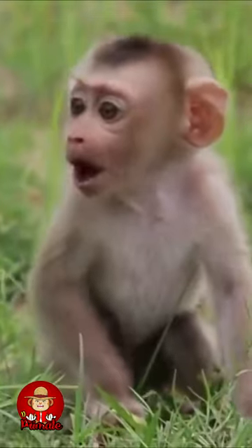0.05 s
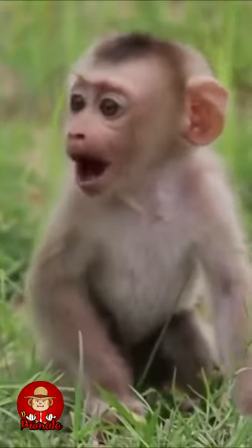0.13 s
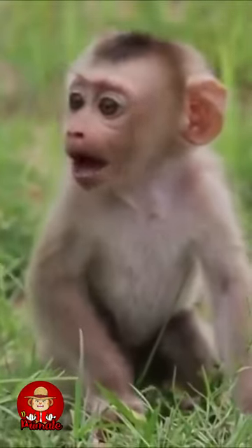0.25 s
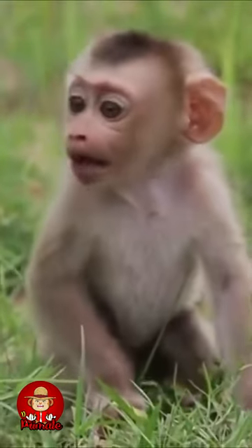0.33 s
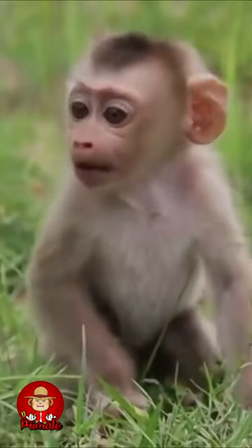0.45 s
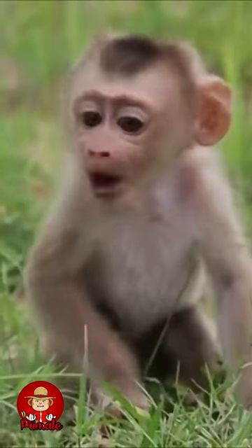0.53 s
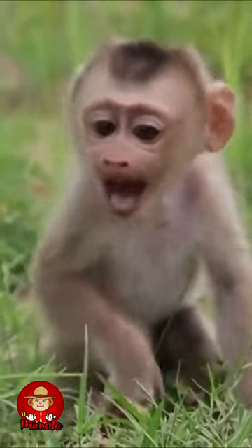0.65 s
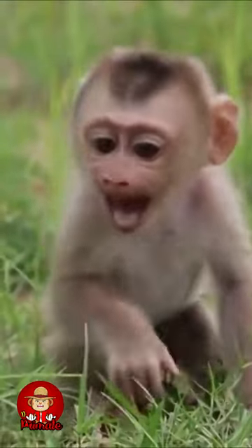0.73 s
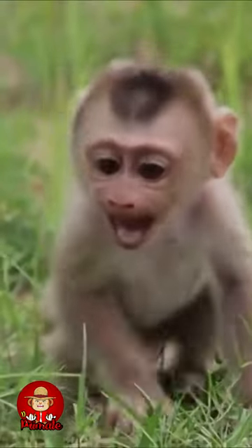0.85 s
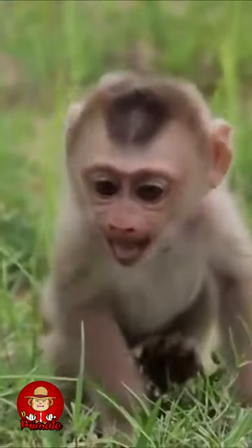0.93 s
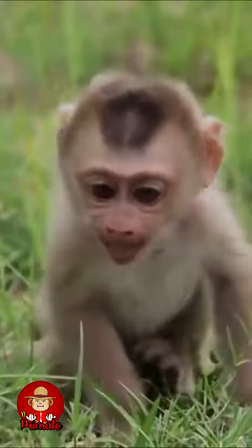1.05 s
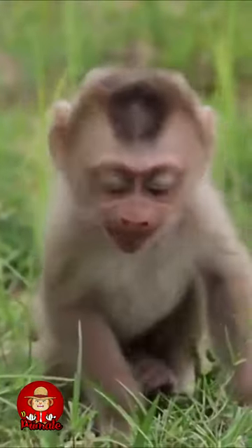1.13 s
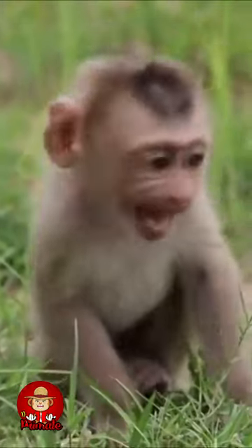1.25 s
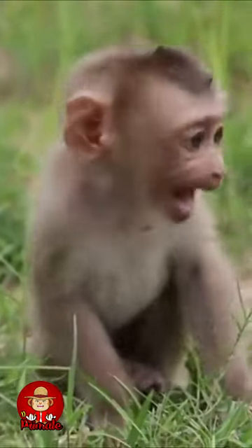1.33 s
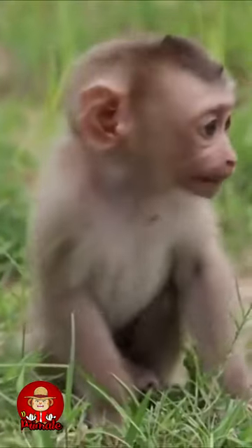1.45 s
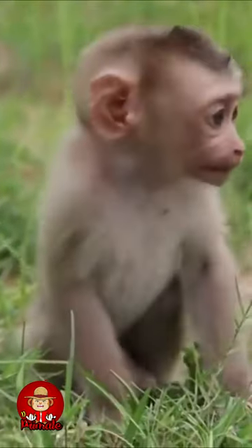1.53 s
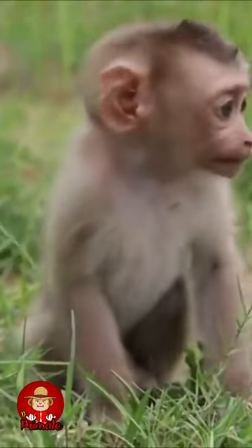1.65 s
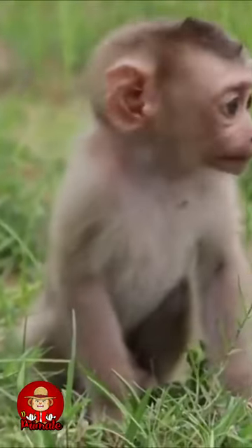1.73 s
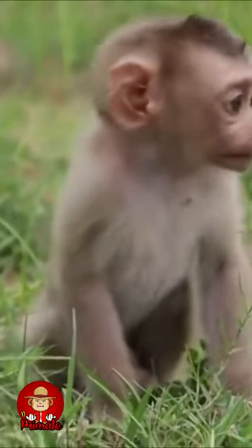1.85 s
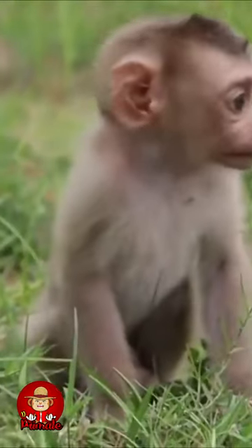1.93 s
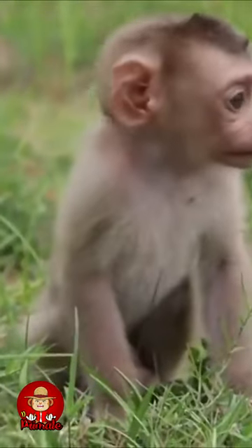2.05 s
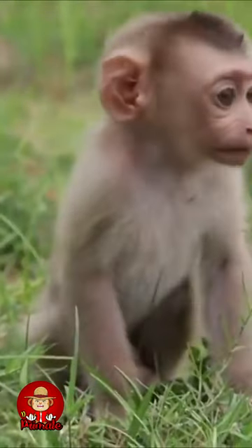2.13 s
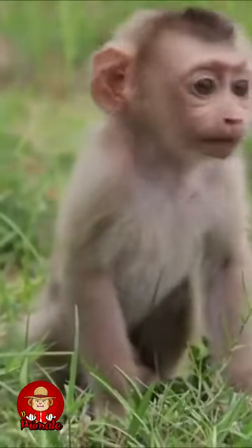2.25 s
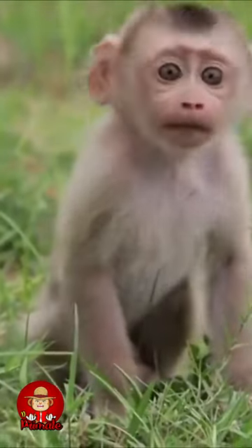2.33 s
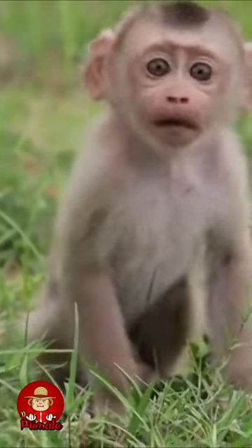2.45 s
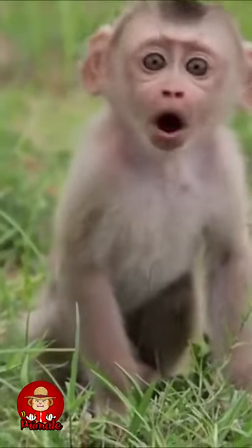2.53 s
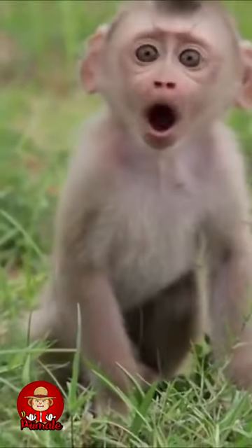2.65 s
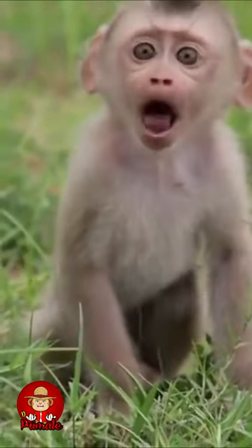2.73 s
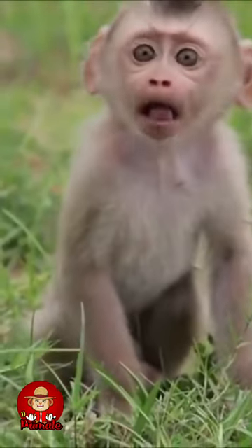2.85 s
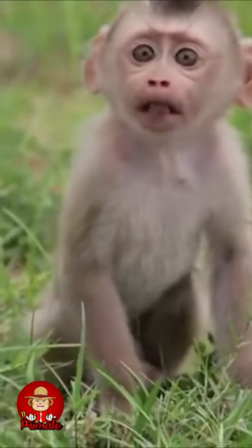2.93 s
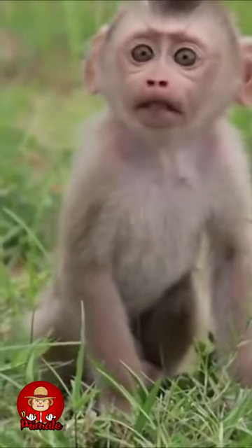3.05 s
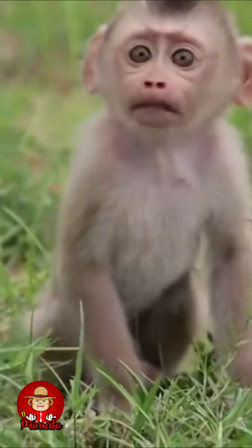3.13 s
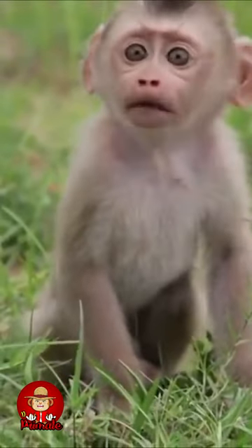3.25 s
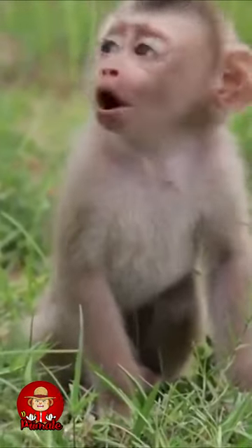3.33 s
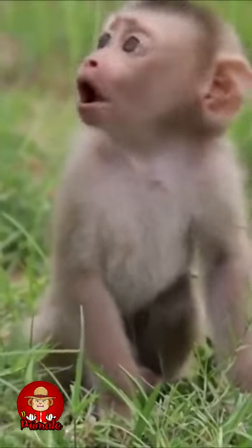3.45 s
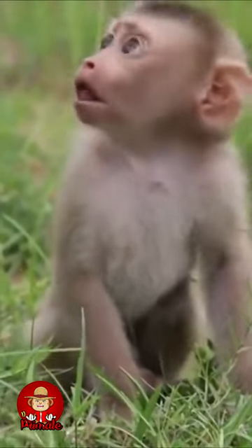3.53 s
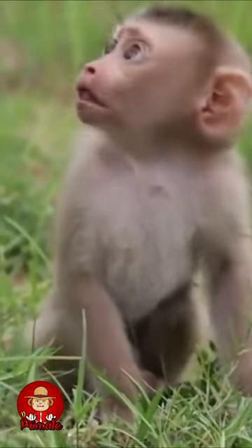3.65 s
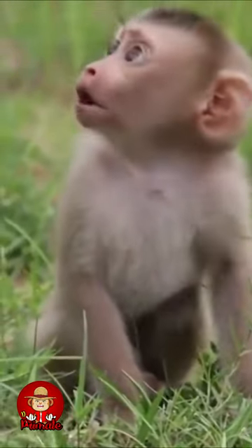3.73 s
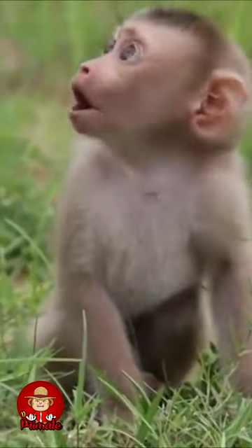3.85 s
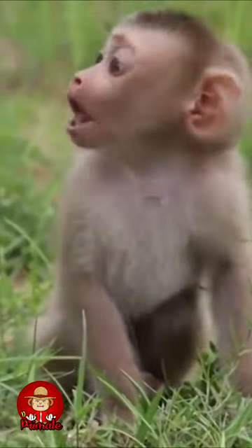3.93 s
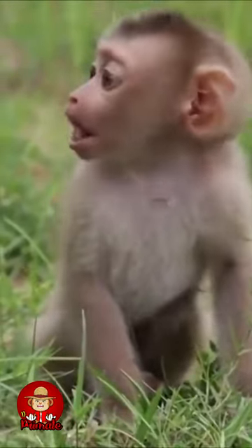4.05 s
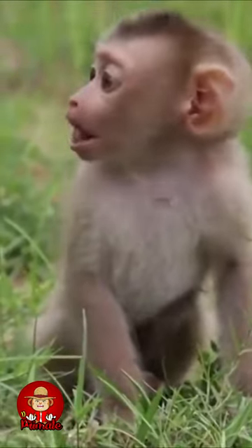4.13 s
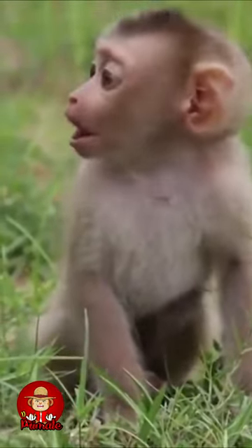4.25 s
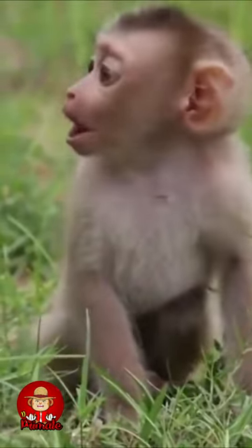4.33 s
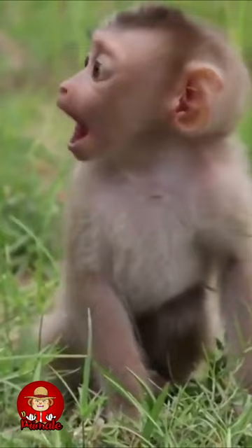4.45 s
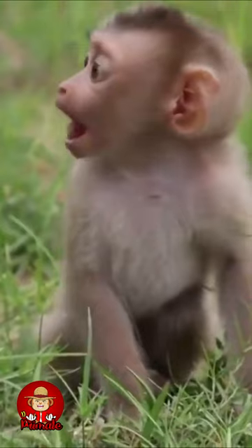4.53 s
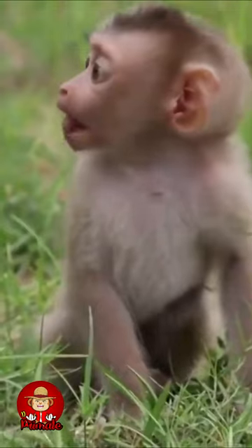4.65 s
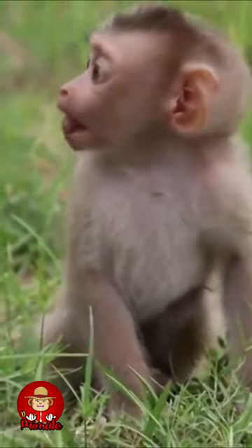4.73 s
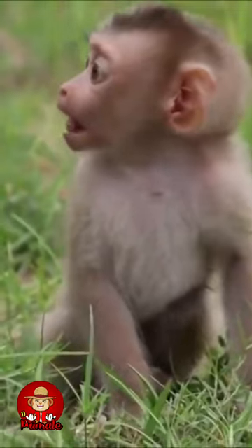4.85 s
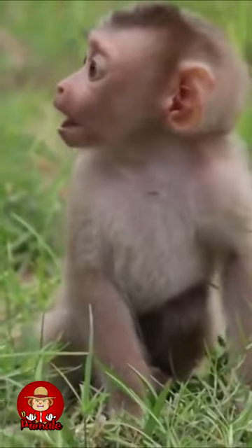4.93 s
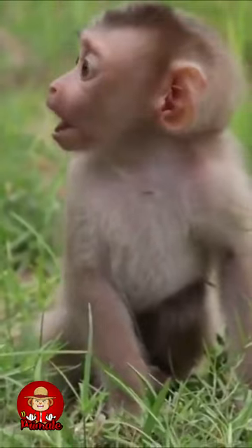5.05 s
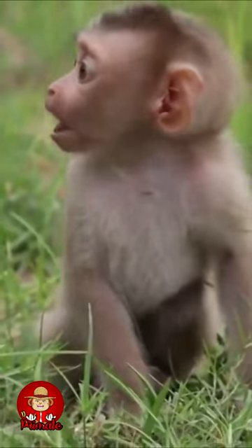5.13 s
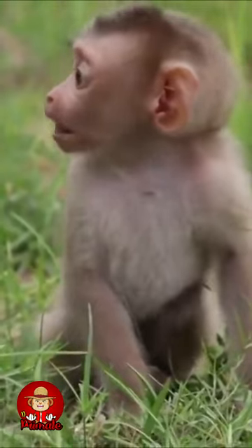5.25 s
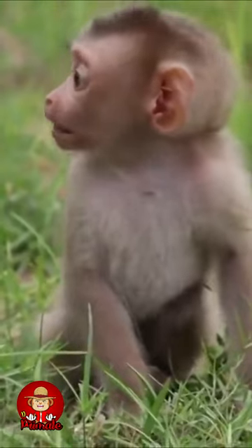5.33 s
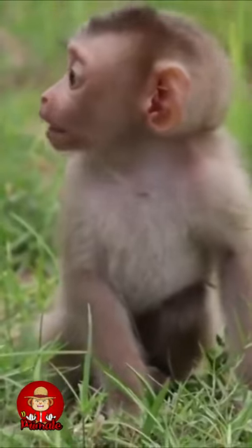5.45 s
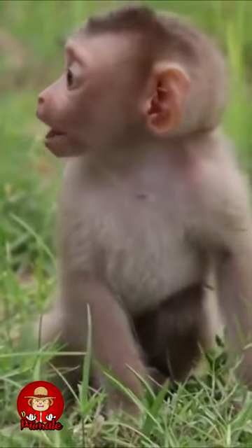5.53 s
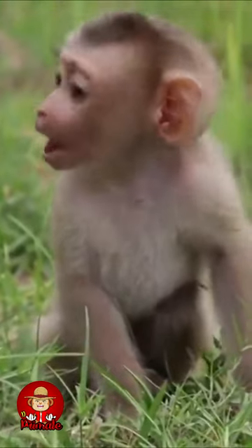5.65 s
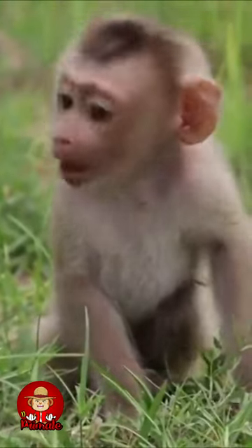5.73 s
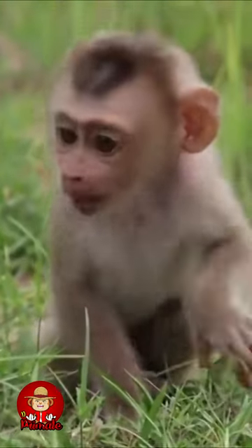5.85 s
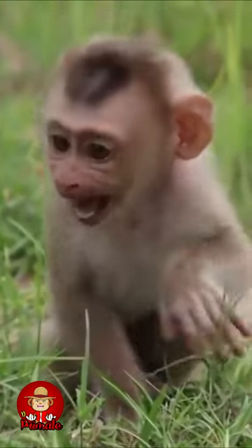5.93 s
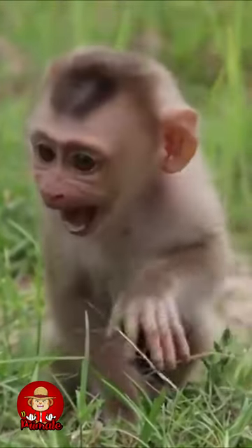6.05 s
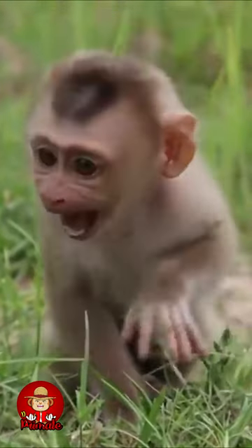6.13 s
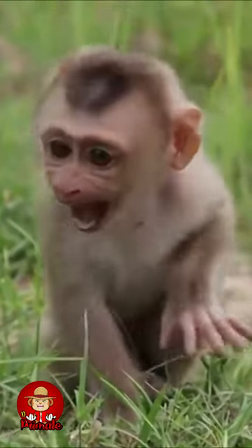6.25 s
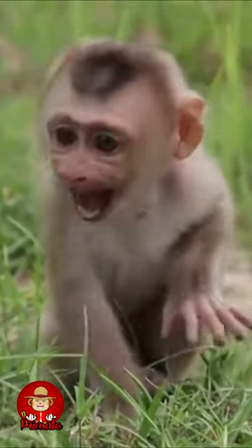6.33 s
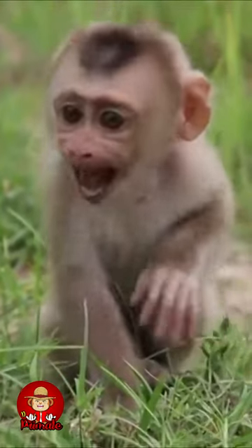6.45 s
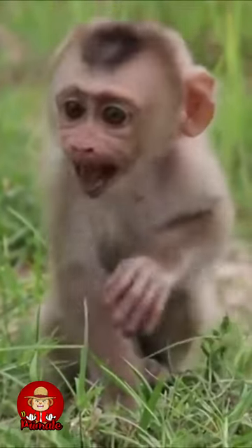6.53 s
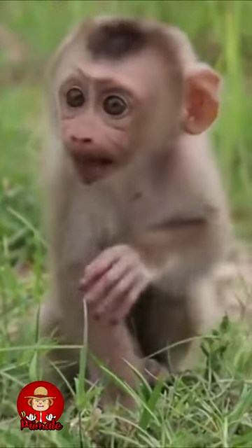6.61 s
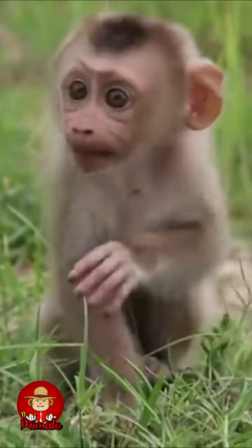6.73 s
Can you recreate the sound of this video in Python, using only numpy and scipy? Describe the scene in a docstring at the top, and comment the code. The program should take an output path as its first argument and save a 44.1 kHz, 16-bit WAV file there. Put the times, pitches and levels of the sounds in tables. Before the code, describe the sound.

Outdoors in grass, a baby monkey calls close to the microphone over a soft low rumble and airy hiss, with almost no reverberation. At 0.2 s a short rising coo cracks into a rasp. At 0.7 s another coo breaks upward into a thin, ragged squeal that soars and drops back by about 1.1 s. A short, rough whistling squeal rises and falls at 1.4-1.6 s. Only the outdoor air is heard until 2.75 s, when a coo cracks and flips into a high whistle. A weaker, brief coo comes at 3.5 s, a hoarse one at 3.9 s, and at 4.5 s a louder one jumps to a whistle. Two more cracking coos follow at 5.1 and 5.6 s. At 6.1 s a piercing scream leaps very high, stays harsh and noisy, clears to a purer tone around 6.45 s, and falls away by 6.65 s, leaving faint breathy traces.

```python
"""Baby monkey calling in the grass

A baby monkey calls ten times, close to the microphone, over a soft outdoor rumble and hiss.
Eight calls start as a rising coo, a stack of harmonics that may crack into a rasp or double its period.
Some jump to a thin whistle register, a nearly pure tone that breaks into noise under strain.
Three calls soar into squeals, the last a long scream that clears to a pure tone."""
import sys
import numpy as np
from scipy import signal
from scipy.fft import rfft, irfft
from scipy.io import wavfile
from scipy.ndimage import uniform_filter1d

SR = 44100
rng = np.random.default_rng(int(sys.argv[2]) if len(sys.argv) > 2 else 0)


def generate_wav(sig):
    """Save sig (samples, or channels by samples) to the path in sys.argv[1] as 16-bit PCM at SR."""
    pcm = np.round(np.clip(np.atleast_2d(sig).T, -1, 1) * 32767).astype(np.int16)
    wavfile.write(sys.argv[1], SR, pcm)


N = 298998


def gain_of(db):
    """Decibels to amplitude."""
    return 10 ** (np.asarray(db) / 20)


def evened(x):
    """Scales to rms 1."""
    return x / np.sqrt(np.mean(abs(x) ** 2) + 1e-20)


def read(points, hz):
    """Reads a spectrum on a log-frequency axis."""
    f, value = np.transpose(points)
    return np.interp(np.log(hz + 1), np.log(f + 1), value)


def add(mix, s, sound):
    """Mixes a sound in at time s."""
    part = mix[round(s * SR):][:len(sound)]
    part += sound[:len(part)]


def coloured(points, size):
    """Noise of rms 1 with the given spectrum."""
    hz = np.fft.rfftfreq(size, 1 / SR)
    white = rfft(rng.standard_normal(size))
    return evened(irfft(white * gain_of(read(points, hz)), size))


def flutter(rate_hz, size, order=4):
    """Random wavering that fades out above the given rate; one stretch of rms 1, repeated if too short."""
    span = 24576  # samples
    hz = np.fft.rfftfreq(span, 1 / SR)
    slowed = rfft(rng.standard_normal(span)) / np.sqrt(1 + (hz / rate_hz) ** order)
    return np.resize(evened(irfft(slowed, span)), size)


def chaos(width_hz, size, order):
    """Random swings of size and phase that smear a tone by the given width to each side."""
    real = flutter(width_hz, size, order=order)
    imaginary = flutter(width_hz, size, order=order)
    return evened(real + 1j * imaginary)


def controls(rows):
    """Time and the columns of a curve, sample by sample, with their corners rounded."""
    s, *columns = np.transpose(rows)
    t = np.arange(s[0], s[-1], 1 / SR)
    return [t] + [uniform_filter1d(np.interp(t, s, c), size=130) for c in columns]


def spell(t, start, end, in_s, out_s):
    """1 between start and end, 0 outside, with soft edges."""
    return (1 + np.tanh((t - start) / in_s)) * (1 - np.tanh((t - end) / out_s)) / 4


def background(level_db=3.5):
    """Low outdoor rumble and hiss, alike at both sides in the bass; it sinks around the loud calls."""
    # Spectrum of the outdoor air. Each row: frequency in Hz, density in dB per Hz (relative).
    air_spectrum = [(18, -45), (30, -15), (88, -2), (237, -1), (399, -4), (505, -11), (691, -8), (1680, -8),
                    (2990, -14), (4910, -17), (9940, -34), (14000, -34), (15500, -42)]
    # Level of the background, which sinks around the loud calls and swells back after them.
    # Each row: time in seconds, level in dB ahead of the overall level_db.
    air_level = [(0, -37), (0.76, -38), (0.87, -48.5), (1.35, -39), (1.6, -41), (2.05, -35.5),
                 (2.82, -35.5), (2.98, -50.5), (3.899, -39), (4.57, -37), (4.66, -50.5), (4.78, -41.5),
                 (5.62, -36.5), (5.85, -41), (6.099, -39), (6.6, -48)]
    # Likeness of left and right. Each row: frequency in Hz, likeness from 0 to 1.
    air_same = [(120, 0.99), (300, .95), (600, 0.65), (3000, 0.2)]
    hz = np.fft.rfftfreq(N, 1 / SR)
    same = np.clip(read(air_same, hz), 0, 1)
    mid = coloured(air_spectrum, N)
    side = irfft(rfft(coloured(air_spectrum, N)) * np.sqrt((1 - same) / (1 + same)), N)
    course_db = np.interp(np.arange(N) / SR, *np.transpose(air_level))
    return gain_of(level_db + course_db) * np.array([mid + side, mid - side])


def gesture(call, cry):
    """The controls of one call: an arch, then a cry with an opening mouth, broken by cracks and doublings."""
    # The voice cracks into a throbbing rasp. Each row: start and end in seconds, pitch jump as a share,
    # change of the overtones in dB, roughness 0-1, time between throbs in seconds, throb swing in dB each way.
    cracks = [ (0.276, 0.3, 0.15, -5, 0.83, 0.0104, 3.5), (0.766, 0.811, 0.12, 1, 0.63, 0.008, 2),
              (2.83, 2.93, 0.14, -4.5, 0.65, 0.0057, 0.7), (4.016, 4.056, 0.18, -15, 0.67, 0.0072, 3),
              (4.539, 4.568, 0.0614, 0.5, 0.9, 0.007, 0), (5.177, 5.191, 0.15, -6, 0.85, 0.0055, 4.5),
              (5.692, 5.726, 0.15, -6, 0.64, 0.0065, 1), ]
    # The period doubles and half lines appear. Each row: start and end in seconds, half lines in dB,
    # roughness 0-1, slope in dB per octave up to the third harmonic, mirrored above it.
    doublings = [ (0.33, 0.361, 6, 0.7, 5), (0.383, 0.414, 1, 0.39, 28), (4.093, 4.115, 6, 0.68, -1.5),
                 (4.145, 4.157, -3, 0.5, 2), (5.247, 5.294, 3, 0.33, 2), (5.75, 5.774, 3.5, 0.39, -12),
                 (5.774, 5.787, 0, 0.74, -2), (5.814, 5.842, -4.5, 0.4, 7), ]
    start_hz, swell_db, arch_shape = 1098, 23, 1.25  # arch_shape: how late the arch lifts
    open_s = 0.045  # time that the mouth takes to open after the top of the coo
    switch_s = 0.001  # the folds change their way of vibrating this fast
    clean_halves_db, crack_halves_db = -28.5, -13.5  # half lines of the steady and of the cracked voice
    doubled_sag, doubled_bright_db = 0.1, 7  # a doubled voice drops by this share and gains overtones

    start, rise, top_hz, top_db, first_db = call
    u = np.linspace(0, 1, 12)
    arch = np.sin(np.pi / 2 * u) ** arch_shape
    lift = [(start + rise * v, start_hz + (top_hz - start_hz) * a, top_db - swell_db * (1 - a), first_db, 0)
            for v, a in zip(u, arch)]
    t, hz, level_db, overtones_db, rough = controls(lift + list(cry))
    opening = np.clip((t - start - rise) / open_s, 0, 1)
    halves_db, tilt_db = np.full(len(t), clean_halves_db), np.zeros(len(t))
    for begin, end, jump, change_db, crack_rough, throb_s, throb_db in cracks:
        on = spell(t, begin, end, switch_s, switch_s)
        hz = hz * (1 + jump * on)
        overtones_db = overtones_db + change_db * on
        level_db = level_db + throb_db * on * np.cos(2 * np.pi * (t - begin) / throb_s)
        halves_db = halves_db + on * (crack_halves_db - halves_db)
        rough = rough + on * (crack_rough - rough)
    for begin, end, doubled_db, doubled_rough, lift_db in doublings:
        on = spell(t, begin, end, switch_s, switch_s)
        tilt_db = tilt_db + lift_db * on
        hz = hz * (1 - doubled_sag * on)
        overtones_db = overtones_db + doubled_bright_db * on
        halves_db = halves_db + on * (doubled_db - halves_db)
        rough = rough + on * (doubled_rough - rough)
    return hz, level_db, overtones_db, halves_db, rough, tilt_db, opening


def fold_phase(hz, rough, jitter, jitter_hz, tremor):
    """Phase of the vocal folds in radians: a slight tremor always, fast jitter when rough."""
    stray = jitter * rough ** 2 * flutter(jitter_hz, len(hz)) + tremor * flutter(157, len(hz))
    return 2 * np.pi * np.cumsum(hz * (1 + stray)) / SR


def sputter(rough, depth, rate_hz=230):
    """Uneven bursts of a strained voice, with mean power 1."""
    bursts = evened(np.tanh(flutter(rate_hz, len(rough))))
    return (1 + depth * rough * bursts) / np.hypot(1, depth * rough)


def coo(call, cry, rasp_db=-4, shimmer=0.24, lag=0.933, breath=0.039, puff_depth=0.24, stiffness=0.33,
        smear=0.58, smear_hz=260):
    """A stack of harmonics through the throat; alternating strong and weak cycles add half lines."""
    # Gain of throat and mouth. Each row: frequency in Hz, gain in dB (relative).
    throat_closed = [(650, -65), (1100, 2), (2800, 6), (3900, -8), (5400, -23.5), (6700, -26), (8000, -19),
                     (11000, -71)]
    # The same with the mouth wide open. Each row: frequency in Hz, gain in dB (relative).
    throat_open = [(780, -48), (1200, 2), (1550, 1), (2200, 6.5), (2900, 6.5), (3500, 1), (4000, -6),
                   (4600, -13), (5400, -16), (6700, -25.5), (8000, -19.5), (11000, -64)]
    # Turbulent air in the throat. Each row: frequency in Hz, density in dB per Hz (relative).
    rasp_spectrum = [(800, -54), (1400, -10), (1900, 7), (2400, 4), (3300, 14.5), (4600, -2.5), (6500, -28),
                     (11000, -18.5), (13000, -26), (15500, -43)]
    hz, level_db, overtones_db, halves_db, rough, tilt_db, opening = gesture(call, cry)
    size = len(hz)
    phase = fold_phase(hz, rough, jitter=0.071, jitter_hz=386, tremor=0.0091)
    k = np.arange(1, 14)[:, None] / 2  # whole numbers are harmonics, the others half lines
    harmonics_db = np.where(k == 1, 0, overtones_db)
    source_db = np.where(k % 1, halves_db + np.maximum(overtones_db, 0), harmonics_db)
    throat_db = (1 - opening) * read(throat_closed, k * hz) + opening * read(throat_open, k * hz)
    lines = gain_of(source_db + throat_db + tilt_db * np.log2(np.minimum(k, 9 / k) / 2))
    # the throat delays the higher lines, which rounds each pulse
    waves = np.exp(1j * (k * phase - lag * k ** 2))
    # roughness smears each line into a band that still follows the pitch
    blur = np.clip(smear * rough, 0, 1)
    smears = np.array([chaos(smear_hz, size, order=6) for _ in k])
    waves = waves * (np.sqrt(1 - blur ** 2) + blur * smears)
    voice = (lines * waves.real).sum(0) / np.sqrt((lines ** 2).sum(0) / 2)
    # air escapes in one puff a cycle
    breath_puffs = coloured(rasp_spectrum, size) * (1 + puff_depth * np.cos(phase))
    share = np.clip(gain_of(rasp_db) * abs(rough) + breath, 0, .95)
    sound = (np.sqrt(1 - share ** 2) * voice + share * breath_puffs) * sputter(rough, shimmer)
    # strained folds cannot swing without limit, which caps the sharpest peaks
    sound = sound / np.hypot(1, stiffness * rough * sound)
    return call[0], gain_of(level_db) * sound * signal.windows.tukey(size, .04)


def rattle(rough):
    """Uneven pulses of a broken whistle, with mean power 1."""
    rate_hz, stray, full_depth = 320, 0.277, 0.34  # stray: scatter of the rate as a share
    turns = np.cumsum(rate_hz * (1 + stray * flutter(rate_hz / 2, len(rough)))) / SR
    depth = full_depth * rough ** 2
    return (1 + depth * np.cos(2 * np.pi * turns)) / np.sqrt(1 + depth ** 2 / 2)


def rough_bands(spacing_hz, size, wander=0.1):
    """A slow second vibration splits a tone into three smeared, parallel bands."""
    # Balance of the bands below, on and above the pitch, one value each in dB.
    band_db = [-7, 2.5, -1]
    width_hz = 180  # smear to either side
    beat = 2 * np.pi * np.cumsum(spacing_hz * (1 + wander * flutter(30.8, size))) / SR
    bands = [gain_of(db) * chaos(width_hz, size, order=6) * np.exp(1j * k * beat)
             for k, db in enumerate(band_db, -1)]
    return evened(sum(bands))


def whistle(curve, strain, third_db=-14, skirt=0.48, skirt_db=-20, shimmer=0.18, stiffness=0.37,
            air_db=-25, spurt_db=-9, spurt_s=0.042, under_db=-38):
    """A nearly pure tone; under strain it breaks into rattling bands of noise around its pitch."""
    easy_rough = 0.11
    fray_s, fray_rough = 0.054, 0.58  # every whistle frays as it ends
    t, hz, level_db = controls(curve)
    (breaks, clears, break_s, clear_s, broken, spread, second_db,
     partner, easy_db, broken_db, spacing_hz, banded) = strain
    rough = easy_rough + (broken - easy_rough) * spell(t, breaks, clears, break_s, clear_s)
    rough = np.maximum(rough, fray_rough * np.exp(-((t[-1] - t) / fray_s) ** 2))
    size = len(hz)
    phase = fold_phase(hz, rough, jitter=0.0523, jitter_hz=258, tremor=0.006)
    share = np.clip(abs(rough) ** 1.38, 0, 1)
    banded = np.clip(banded, 0, 1)
    loose = chaos(spread * hz.mean(), size, order=14)
    wild = np.sqrt(1 - banded) * loose + np.sqrt(banded) * rough_bands(spacing_hz, size)
    # the folds stiffen on their widest swings, which caps the peaks of the noise
    wild = evened(wild / np.hypot(1, stiffness * abs(wild)))
    fringe = gain_of(skirt_db) * rough * chaos(skirt * hz.mean(), size, order=10)
    swing = np.sqrt(1 - share ** 2) + share * wild + fringe
    swing = swing * sputter(rough, shimmer, rate_hz=120) * rattle(rough)
    # a second, slower vibration of the folds adds a faint line above the tone and one below
    lines = gain_of(easy_db + (broken_db - easy_db) * rough) * np.exp(1j * (1 + partner) * phase)
    lines = lines + gain_of(under_db) * np.exp(1j * (1 - partner) * phase)
    # overtones fade towards the top of the treble and as the tone breaks up
    for k, db in enumerate([second_db, second_db + third_db], 2):
        fade = (1 - share) / (1 + (k * hz / 11500) ** 4) * (k * hz < SR / 2)
        lines = lines + gain_of(db) * fade * np.exp(1j * k * phase)
    tone = np.sqrt(2) * (swing * (np.exp(1j * phase) + lines)).real
    # air hisses through the mouth under strain, and in a spurt when a tone starts rich in overtones
    spurt = gain_of(spurt_db + second_db) * np.exp(-(t - t[0]) / spurt_s)
    air = (gain_of(air_db) * rough + spurt) * rng.standard_normal(size)
    return t[0], gain_of(level_db) * (tone + air) * signal.windows.tukey(size, .02)


def puff(start, length, hz, level_db, width=0.31):
    """A short, soft band of noise."""
    size = round(length * SR)
    carrier = np.exp(2j * np.pi * hz * np.arange(size) / SR)
    band = (chaos(width * hz, size, order=6) * carrier).real
    return start, gain_of(level_db) * evened(band) * np.hanning(size)


def mouth(x):
    """The open mouth shapes the whistle register and dulls the top of the treble."""
    # Gain of the mouth in the whistle register. Each row: frequency in Hz, gain in dB.
    mouth_gain = [(6400, 1.5), (7050, -0.5), (7550, -3), (8000, -1), (8550, -3), (9050, -3), (10000, -3.5),
                  (11000, -0.5), (15000, -7.5)]
    return irfft(rfft(x) * gain_of(read(mouth_gain, np.fft.rfftfreq(N, 1 / SR))), N)


def ports(x):
    """Two close microphone ports hear the monkey with different colour and phase."""
    # The monkey's direction at the ports. Each row: frequency in Hz, left over right in dB,
    # phase by which left leads in radians.
    port_table = np.array([(1600, 2.5, 0.57), (1940, -11.5, -1.8), (2330, -0.5, 1.53), (2550, -5, -0.96),
                           (3040, -1.5, 1.73), (3290, -8.5, 2.5), (3380, -9, -0.9), (3620, 3.5, 3),
                           (3730, 8.5, 0.33), (4370, -1.5, 0.77), (5600, 0, -0.5), (5460, 8, 4),
                           (6050, -1, -0.4), (7800, -0.5, 1.4), (11000, -0.5, 1)])
    hz = np.fft.rfftfreq(N, 1 / SR)
    lean_db, lead = read(port_table[:, :2], hz), read(port_table[:, ::2], hz)
    lean = gain_of(lean_db / 2) * np.exp(.5j * lead)  # half to each side
    return irfft(rfft(x) * np.array([lean, 1 / lean]), N)


def surroundings(x, wet_db=-27):
    """Faint, short scatter from ground and plants: a decaying noise tail on each side."""
    t60 = .13  # seconds to fall by 60 dB
    t = np.arange(SR // 4) / SR
    tail = rng.standard_normal((2, len(t))) * np.exp(-np.log(1000) * t / t60)
    return gain_of(wet_db) * signal.oaconvolve(x[None], tail / np.linalg.norm(tail[0]), axes=1)[:, :N]


def scene():
    """Both registers of the one voice, in the open air."""
    # Opening arch of each coo. Each row: start in seconds, rise in seconds, top pitch in Hz,
    # top level in dB, overtones in dB.
    coos = [ (0.22, 0.05, 1397, -10.5, -1), (0.714, 0.05, 1372, -12, -2.5), (2.746, 0.053, 1262, -16.5, -3),
            (3.495, 0.06, 1300, -19.5, -4), (3.932, 0.061, 1325, -15, -5),
            (4.474, 0.062, 1414, -12.5, -1.5), (5.105, 0.055, 1357, -14, 1.5),
            (5.608, 0.072, 1384, -13.5, -3), ]
    # How each call goes on after its coo, one curve a call. Each row of a curve: time in seconds,
    # pitch in Hz, level in dB, overtones in dB, hoarseness 0-1; cracks and doublings bend these.
    cries = [
        [(0.273, 1388, -15, 0, 0.05), (0.281, 1323, -18.5, 0, 0.37), (0.305, 1372, -17, 1, 0.7),
         (0.324, 1490, -14.5, -1.5, 0.4), (0.342, 1518, -13, 2, 0.3), (0.372, 1486, -16.5, 8, 0.3),
         (0.392, 1440, -17, 10, 0.3), (0.405, 1356, -23.5, 12, 0.5), (0.415, 1290, -33, 12, 0.5)],
        [(0.771, 1363, -18, 2, 0.2), (0.785, 1387, -11.5, 5, 0.4), (0.804, 1450, -10.5, 11, 0.4),
         (0.813, 1527, -18, 16, 0.8), (0.855, 1600, -25, 20, 0.35)],
        [(2.825, 1217, -23, -5, 0), (2.83, 1235, -20, -11, 0.1), (2.838, 1332, -14, -4, 0.3),
         (2.862, 1498, -10.5, 7, 0.3), (2.871, 1497, -15, 12, 0.3), (2.876, 1343, -23, 15, 0.4),
         (2.895, 1384, -25, 19, 0.4), (2.925, 1416, -38, 16, 0.4)],
        [(3.562, 1269, -29.5, -5, 0.05), (3.59, 1276, -23.5, -1, 0.04), (3.606, 1196, -29, -6, 0.2),
         (3.63, 1263, -26, 4, 0.3), (3.647, 1150, -37, 2, 0.3)],
        [(3.997, 1289, -21.5, -1, 0.03), (4.014, 1303, -18.5, -7, 0), (4.04, 1391, -18, -9, 0.4),
         (4.06, 1363, -15.5, -4.5, 0.5), (4.085, 1515, -15.5, -3, 0.54), (4.098, 1500, -12.5, 3, 0.6),
         (4.118, 1393, -19, 8, 0.37), (4.128, 1148, -21, 15, 0.03), (4.14, 1290, -22.5, 12, 0.1),
         (4.153, 1250, -26, 12, 0.6), (4.161, 1150, -46, 12, 0.5)],
        [(4.54, 1440, -15, -1, 0.1), (4.562, 1432, -16.5, 3, 0.6), (4.58, 1478, -14.5, 0.5, 0.2),
         (4.594, 1570, -11, 6.5, 0.37), (4.61, 1550, -21.5, 14, 0.4), (4.632, 1550, -34, 12, 0.5)],
        [(5.171, 1358, -18.5, -4, 0), (5.177, 1303, -21, 5, 0.3), (5.2, 1330, -17, -2, 0.08),
         (5.222, 1218, -19, 15, 0), (5.234, 1420, -16.5, -1.5, 0.2), (5.247, 1498, -15.5, 2, 0.6),
         (5.253, 1447, -14.5, 6, 0.2), (5.282, 1410, -24, 10, 0.4), (5.296, 1170, -31, 10, 0.5)],
        [(5.686, 1320, -23, -4, 0.23), (5.7, 1376, -15, 1, 0.3), (5.722, 1447, -13, 4.5, 0.3),
         (5.733, 1320, -17, 9, 0.2), (5.746, 1477, -14, 4, 0.3), (5.756, 1664, -12, 4, 0.4),
         (5.772, 1702, -10.5, 14, 0.4), (5.786, 1697, -13.5, 13, 0.5), (5.793, 1600, -17, 11, 0.6),
         (5.797, 1400, -19, 18, 0), (5.804, 1306, -12, 19, 0.14), (5.811, 1630, -20, 8, 0.37),
         (5.832, 1487, -21.5, 14, 0.4), (5.85, 1250, -32, 14, 0.4)],
    ]
    # The whistle register, one curve a tone; two may sound at once. Each row of a curve:
    # time in seconds, pitch in Hz, level in dB ahead of the mouth.
    whistles = [
        [(0.805, 2590, -24), (0.812, 2550, -11), (0.835, 2610, -14), (0.846, 2900, -18.5), (0.863, 3155, -19.5),
         (0.91, 3380, -22), (0.915, 3450, -32)],
        [(0.846, 3390, -16), (0.862, 4050, -19), (0.882, 4910, -23), (0.911, 5050, -31), (0.916, 4200, -30),
         (0.935, 5960, -32), (0.957, 6280, -29.5), (0.98, 7260, -31), (0.996, 6700, -29), (1.003, 6100, -22.5),
         (1.02, 4500, -24.5), (1.029, 3830, -15.5), (1.045, 3180, -21.5), (1.053, 3360, -23)],
        [(1.051, 2890, -28), (1.064, 3080, -19.5), (1.07, 2900, -28), (1.076, 2780, -40)],
        [(1.382, 1893, -33.5), (1.4, 2703, -14.5), (1.412, 3174, -15.5), (1.428, 3525, -20.5),
         (1.442, 3800, -24.5), (1.456, 3936, -23), (1.482, 3833, -19), (1.5, 3200, -21.5), (1.515, 2953, -25),
         (1.526, 2855, -22.5), (1.542, 2454, -26), (1.556, 2160, -29), (1.565, 2750, -32), (1.6, 2660, -34.5),
         (1.625, 2550, -42)],
        [(2.869, 2162, -13.5), (2.897, 2465, -12), (2.92, 2620, -14), (2.95, 2745, -12), (2.972, 2620, -16),
         (2.986, 2680, -28.5), (3.012, 2800, -31.5), (3.024, 2650, -49)],
        [(4.592, 2110, -22.5), (4.602, 2356, -10.5), (4.638, 2720, -13.5), (4.654, 2530, -23),
         (4.671, 2650, -18), (4.684, 2440, -28.5), (4.694, 2430, -36)],
        [(6.102, 2260, -31), (6.109, 2550, -6.5), (6.116, 3514, -26.5), (6.134, 5300, -16.5),
         (6.138, 5690, -16), (6.143, 5890, -14), (6.162, 5966, -15.5), (6.167, 6020, -18), (6.175, 6200, -14.5),
         (6.182, 7050, -16), (6.2, 7120, -19), (6.22, 7000, -16.5), (6.255, 7000, -14.5), (6.275, 7990, -16),
         (6.33, 8050, -14.5), (6.345, 8000, -14), (6.4, 7600, -13.5), (6.428, 7550, -14), (6.45, 7390, -12),
         (6.472, 6580, -12.5), (6.505, 6280, -12.5), (6.535, 6630, -14.5), (6.55, 6310, -12),
         (6.572, 6070, -10.5), (6.584, 5700, -24), (6.59, 5320, -26.5), (6.612, 3970, -28),
         (6.635, 3440, -37.5)],
    ]
    # The strain on each of those tones. Each row: breaks up at and clears at in seconds, time to break and
    # to clear in seconds, roughness (about 0-1), width of the noise as a share of the pitch, overtone in dB,
    # side line's offset as a share of the pitch, side line in dB at roughness 0 and at roughness 1,
    # spacing of the rough bands in Hz, their share of the noise 0-1.
    strains = [ (0.831, 0.862, 0.0072, 0.0066, 0.53, 0.14, -19, 0.6, -25, -15, 708, 0.2),
               (0.911, 1.027, 0.003, 0.0044, 1.07, 0.23, -25, 0.34, -22, -23, 853, 0.75),
               (1.05, 1.056, 0.003, 0.003, 0.5, 0.2, -12, 0.49, -4, -8, 693, 0.6),
               (1.423, 1.63, 0.005, 0.008, 0.83, 0.28, -1.5, 0.56, -34, -4, 780, 0.93),
               (2.855, 2.92, 0.0074, 0.005, 0.56, 0.23, -18.5, 0.67, -18, -7.5, 698, 0.34),
               (4.58, 4.624, 0.008, 0.008, 0.43, 0.16, -23, 0.65, -26, -10, 750, 0.3),
               (6.168, 6.429, 0.012, 0.041, 0.99, 0.17, -16, 0.61, -28, -24.5, 974, 0.74), ]
    # Noise bursts under the squeals, and two faint ones after the scream. Each row: start in seconds,
    # length in seconds, centre in Hz, level in dB ahead of its fades and the mouth.
    puff_rows = [(0.953, 0.0072, 5500, -25), (0.97, 0.011, 4950, -31), (0.985, 0.0086, 5000, -31),
                 (1.454, 0.0075, 4620, -25), (1.481, 0.006, 4680, -23), (6.209, 0.0077, 5060, -32),
                 (6.221, 0.0049, 4940, -34), (6.24, 0.0057, 5000, -35), (6.321, 0.016, 4440, -32.5),
                 (6.652, 0.038, 3270, -43), (6.733, 0.042, 4230, -47)]
    low, high = np.zeros((2, N))
    for call, cry in zip(coos, cries):
        add(low, *coo(call, cry))
    for curve, strain in zip(whistles, strains):
        add(high, *whistle(curve, strain))
    for row in puff_rows:
        add(high, *puff(*row))
    monkey = low + mouth(high)
    return ports(monkey) + surroundings(monkey) + background()


def record(dry):
    """The recorder's band limit, a steep low-pass."""
    edge_hz = 15550
    lowpass = signal.firwin(511, edge_hz, window=("kaiser", 9), fs=SR)
    return signal.oaconvolve(dry, lowpass[None], "same")


dry = scene()
out = record(dry)
generate_wav(out)
```